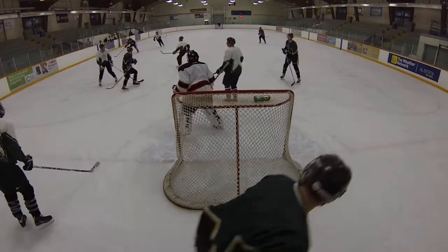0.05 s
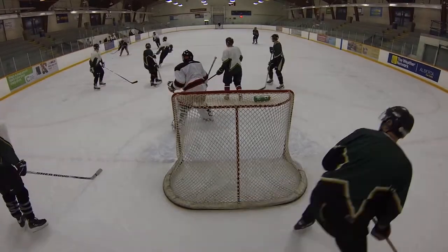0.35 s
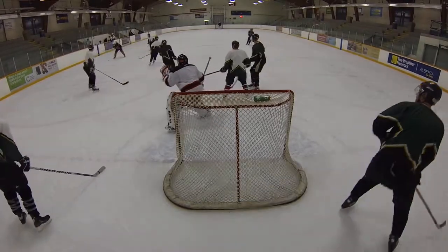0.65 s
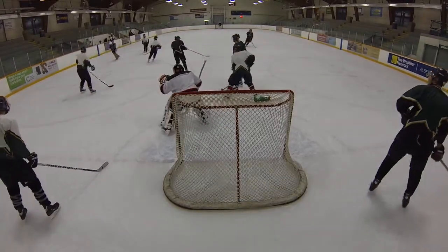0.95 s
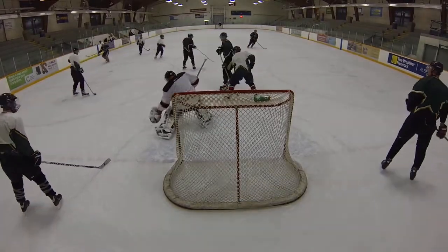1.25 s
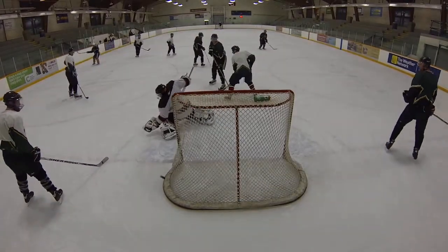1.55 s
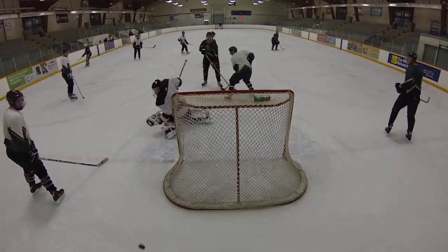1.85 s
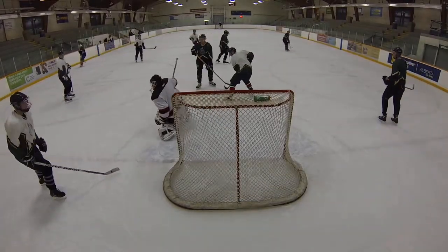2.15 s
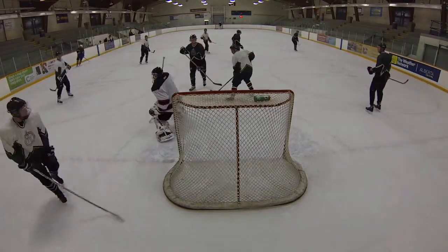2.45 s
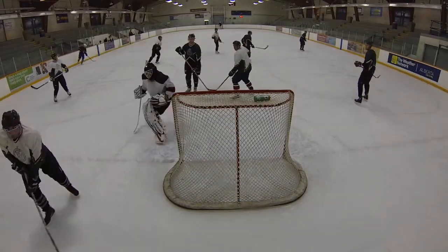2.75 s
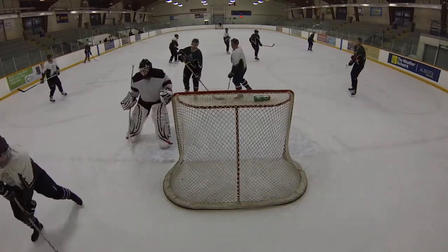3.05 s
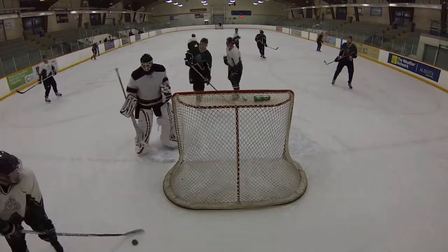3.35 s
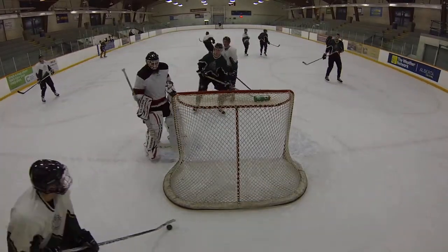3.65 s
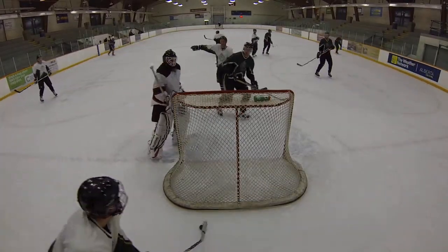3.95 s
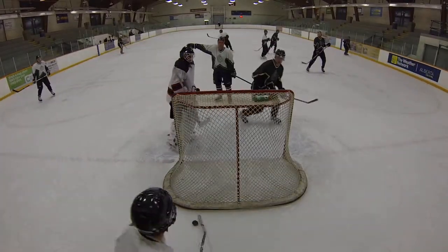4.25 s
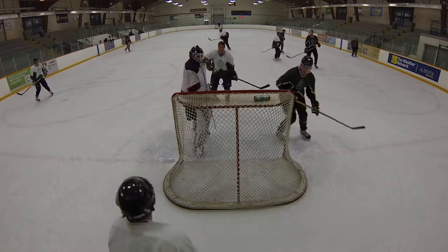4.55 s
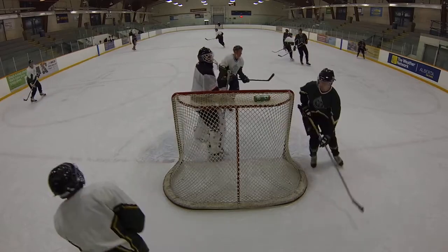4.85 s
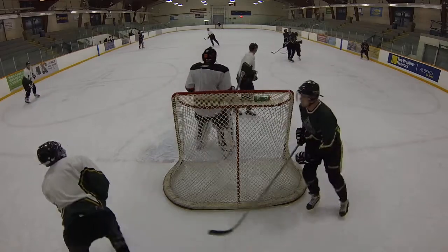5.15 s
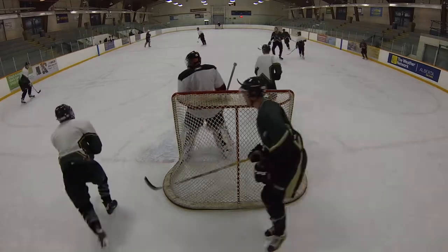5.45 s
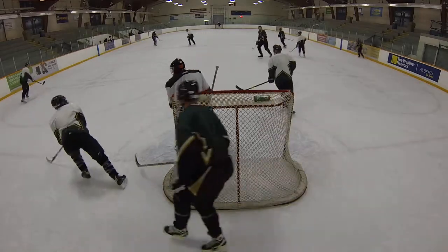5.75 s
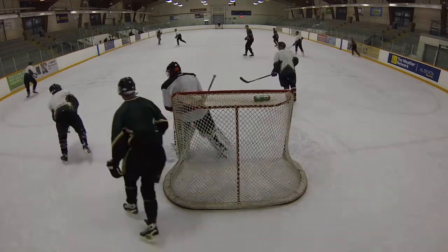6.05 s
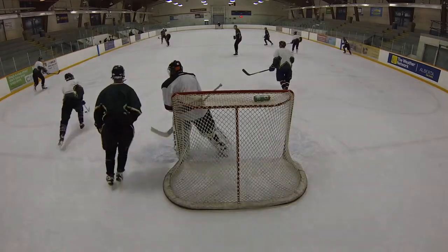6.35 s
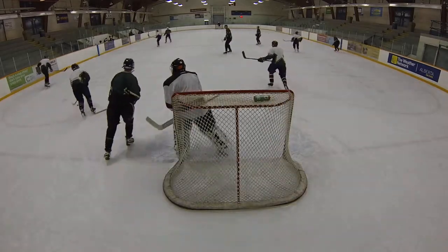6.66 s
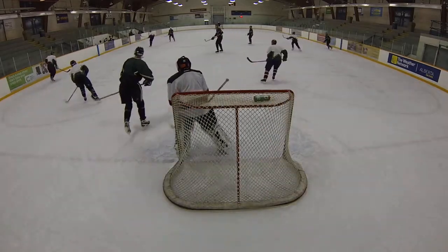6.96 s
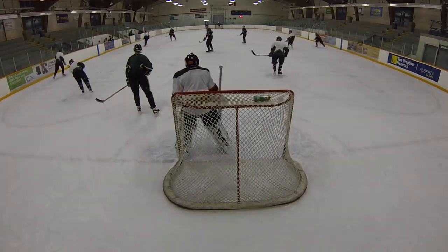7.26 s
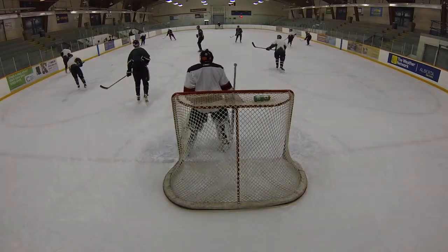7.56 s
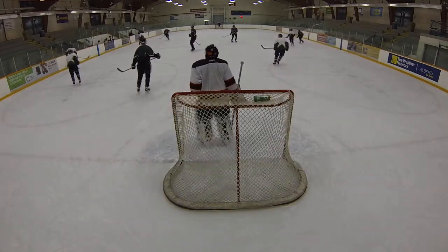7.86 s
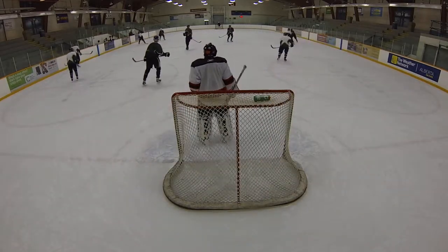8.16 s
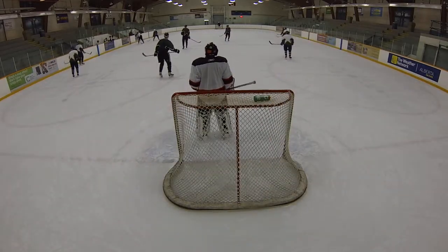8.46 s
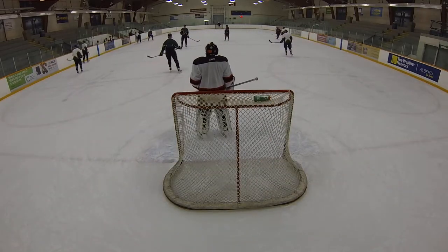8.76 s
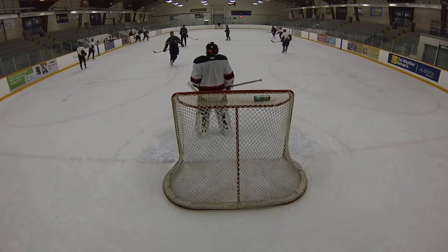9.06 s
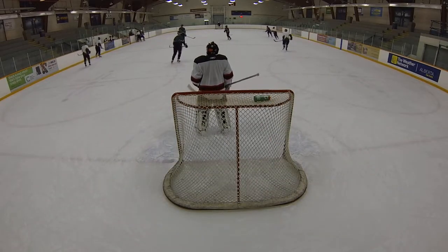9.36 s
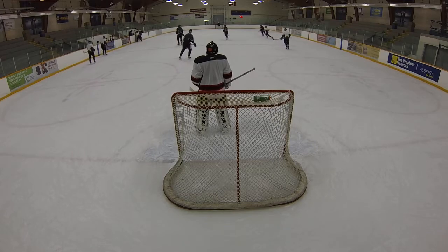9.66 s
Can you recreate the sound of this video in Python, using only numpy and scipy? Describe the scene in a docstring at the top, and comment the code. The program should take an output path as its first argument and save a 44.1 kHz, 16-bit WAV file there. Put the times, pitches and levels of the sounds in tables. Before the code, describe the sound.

Ice hockey in an indoor arena, heard from the glass behind the goal with a slightly hollow tone. Skates scrape and carve as a sharp shot echoes through the hall, then the puck thumps heavily into the boards. A skater stops hard with a spray of snow, among stick taps and dull bumps. The skating thins and a second shot cracks near the end, over humming boards and steady ventilation.

```python
"""Ice hockey in an indoor arena

Blades chip the ice as they carve and stop; sticks and puck clack, and two shots ring through the hall.
Boards and glass hum with the skating and thump under the puck, over the rush of the ventilation.
Heard from a cased camera on the glass behind the goal, whose case adds a hollow resonance."""
import sys
import numpy as np
from scipy import signal
from scipy.fft import rfft, irfft, next_fast_len
from scipy.io import wavfile
from scipy.ndimage import uniform_filter1d

SR = 44100
rng = np.random.default_rng(int(sys.argv[2]) if len(sys.argv) > 2 else 0)


def wav_record(signal):
    """Record a signal, one row per channel, as 16-bit PCM in the file named by sys.argv[1]."""
    frames = np.transpose(np.atleast_2d(signal))
    bounded = np.clip(frames, -1, 1)
    # unit amplitude maps onto the largest positive 16-bit level
    quanta = np.round(bounded * 32767).astype(np.int16)
    wavfile.write(sys.argv[1], SR, quanta)


N = 432621
HZ = np.fft.rfftfreq(N, 1 / SR)
TIME = np.arange(N) / SR
BAND_LIMIT_HZ = 15000

# normal modes of the boards and glass: f/Hz, relative level/dB, T60/s
BOARD_MODES = [(95.5, -16, 0.4), (136, -12, 0.13), (217, -2, 0.027), (288.5, -1, 0.15), (402, -12, 0.059),
               (542, -9.5, 0.06), (778, -8.5, 0.08), (866, -22, 0.21), (1000, -11, 0.023),
               (1177, -15.5, 0.041), (1420, -18, 0.025)]
# spectrum of ice spray: f/Hz, relative level/dB
SPRAY_SPECTRUM = [(1000, -39.5), (2400, -11.5), (3500, -7), (5000, -0.5), (8000, 3.5), (14000, 0)]


def amp(db):
    """Amplitude ratio of a level in decibels."""
    return 10 ** (np.asarray(db) / 20)


def unit(x):
    """Normalisation to rms 1."""
    return x / np.sqrt(np.mean(x ** 2) + 1e-20)


def at_peak(x, peak_db):
    """Normalisation to a peak level."""
    return amp(peak_db) * x / abs(x).max()


def curve(points, hz=HZ):
    """Linear interpolation on a logarithmic frequency axis."""
    f, value = np.transpose(points)
    return np.interp(np.log(hz + 1), np.log(f + 1), value)


def envelope(points):
    """Amplitude envelope from levels interpolated in time."""
    return amp(np.interp(TIME, *np.transpose(points)))


def add(mix, start_s, sound):
    """Superposition of a sound on the mix."""
    part = mix[max(round(start_s * SR), 0):][:len(sound)]
    part += sound[:len(part)]


def coloured(x, db):
    """Spectral shaping by levels given on HZ, to rms 1."""
    size = next_fast_len(N, True)
    gain = amp(np.interp(np.fft.rfftfreq(size, 1 / SR), HZ, db))
    return unit(irfft(rfft(x, size) * gain, size)[:N])


def minimum_phase(db):
    """Causal impulse response of a spectrum, by the Hilbert transform of its log magnitude."""
    log_gain = np.log(amp(np.r_[db, db[-2:0:-1]]))
    return np.fft.ifft(np.exp(np.conj(signal.hilbert(log_gain)))).real


def wander(per_s):
    """Slow random modulation of rms about 1."""
    knots = rng.standard_normal(N // 50)
    return np.interp(TIME * per_s, np.arange(len(knots)), knots) * np.sqrt(3 / 2)


def drone(db, hold_s):
    """A resonance under random excitation, its slow swells evened out."""
    x = coloured(rng.standard_normal(N), db)
    power = uniform_filter1d(x ** 2, max(int(hold_s * SR), 2))
    return x / np.sqrt(abs(power) + 1e-4)


def resonate(x, hz, width_hz):
    """A resonator of unit gain whose centre frequency follows the curve hz."""
    phasor = np.exp(2j * np.pi * np.cumsum(hz) / SR)
    pole = np.exp(-np.pi * width_hz / SR)
    return 2 * (phasor * signal.lfilter([1 - pole], [1, -pole], x / phasor)).real


def case_db(hz):
    """Transmission through the camera case: its wall absorbs treble and its resonances add peaks."""
    # resonances and notches: f/Hz, width/Hz, gain/dB
    resonances = [(552, 126, 5), (768, 96, 11), (868, 63, 6), (1060, 160, -1), (1326, 400, 13),
                  (1607, 390, 16.5), (2203, 258, 9), (2700, 370, 0.5), (3030, 255, 10.5), (3427, 365, 11.5),
                  (3853, 390, 7), (4960, 790, 4.5), (7550, 1400, 4)]
    # transmission of the wall: f/Hz, gain/dB
    wall = [(60, -13.5), (200, -1.5), (400, 2.5), (1000, 1.5), (1950, -3.5), (2700, -5), (4200, -14),
            (6000, -20.5), (9000, -33), (12000, -38.5), (14500, -47.5)]
    peaks = sum(db * 2 ** -((2 * (hz - f) / width) ** 2) for f, width, db in resonances)
    return curve(wall, hz) + peaks


def ventilation(case):
    """Moving air radiates steady broadband noise."""
    # spectrum of the air: f/Hz, relative level/dB
    spectrum = [(30, 1.5), (90, 19.5), (200, 4.5), (400, 2.5), (800, -5), (1500, -5), (3000, -4),
                (5000, -9.5), (8000, 2.5), (14000, 7.5)]
    return amp(-45.5) * coloured(rng.standard_normal(N), case + curve(spectrum))


def far_tones():
    """Narrow-band noise is heard as pitch: two faint tones swell far down the rink."""
    # tones: start t/s, peak t/s, end t/s, f/Hz, width/Hz, level/dB
    tones = [(9.2, 9.42, 10.4, 448, 20, -47), (9.15, 9.42, 9.62, 2250, 30, -46)]
    out = np.zeros(N)
    for start, peak, end, hz, width, db in tones:
        tone = drone(-20 * np.log10(1 + (2 * (HZ - hz) / width) ** 2), hold_s=0.058)
        out += amp(db) * np.interp(TIME, [start, peak, end], [0, 1, 0]) * tone
    return out


def hall(x, early_db, early_t60, late_db, late_s):
    """Reverberation: early scatter from glass and ice, then a long tail from roof and far walls."""
    # reverberation time: f/Hz, T60/s
    decay = [(200, 2.4), (800, 3.3), (1500, 3.1), (3000, 2.4), (5000, 1.3), (8000, 0.56), (14000, 1)]
    # colour of the reflections: f/Hz, relative level/dB
    walls = [(500, 0.86), (1000, 0.081), (1450, -0.78), (2400, -1.2), (3800, -1.7), (7000, 1.3),
             (13000, -1.2)]
    reflections = rng.standard_normal(2 * SR) * (rng.random(2 * SR) < 5000 / SR)
    hz, t, bands = signal.stft(reflections, SR, nperseg=256)
    far_echo = amp(late_db) * np.exp(-((t - late_s) / 0.09) ** 2)
    late = amp(-60 * t / curve(decay, hz)[:, None]) * (1 + far_echo)
    early = amp(early_db - 60 * t / early_t60)
    onset = np.clip(t / 0.0045, 0, 1)
    colour = amp(curve(walls, hz))[:, None]
    tail = signal.istft(bands * colour * (late + early) * onset, SR, nperseg=256)[1]
    return signal.fftconvolve(x, tail / np.linalg.norm(tail))[:N]


def strokes(rows, layer, rise_s, fall_s, ends_db):
    """Incoherent blade strokes add in power; each follows a parabola in level, ends_db at its ends."""
    column = {"scrape": 2, "spray": 3, "hum": 4}[layer]
    power = np.zeros(N)
    for row in rows:
        start, length = row[:2]
        t = np.arange(0, length, 1 / SR)
        contact = np.clip(np.minimum(t / rise_s, (length - t) / fall_s), 0, 1)
        load = amp(row[column] + ends_db * (2 * t / length - 1) ** 2)
        add(power, start, (contact * load) ** 2)
    return np.sqrt(power)


def striding(layer, ends_db, far_db):
    """Envelope of a skating layer: the power sum of near strides and steady far players."""
    # strides and carves: start t/s, length/s, then mid-stroke level/dB of scrape, spray and hum
    strides = [(0.0, 0.25, -39.5, -59, -50), (0.14, 0.53, -31, -50, -39), (0.56, 0.45, -33.5, -52.5, -40.5),
               (0.88, 0.73, -34.5, -53, -48.5), (1.96, 0.38, -38.5, -53, -48.5),
               (2.5, 0.36, -42, -58.5, -44.5), (2.85, 0.72, -42, -60.5, -53), (3.28, 0.28, -40, -65, -38.5),
               (4.36, 0.48, -41.5, -60, -43), (4.78, 0.51, -34.5, -51.5, -40),
               (5.24, 0.76, -44, -59.5, -40.5), (5.98, 0.46, -41, -60.5, -47),
               (6.46, 0.595, -43.5, -60, -47.5), (7.1, 0.56, -39.5, -66, -52),
               (7.54, 0.6, -43, -63.5, -52.5), (9.02, 0.46, -37.5, -60.5, -62),
               (9.36, 0.45, -37, -58, -54.5)]
    near = strokes(strides, layer, rise_s=0.027, fall_s=0.075, ends_db=ends_db)
    return np.hypot(near, amp(far_db))


def skidding(layer, ends_db):
    """Envelope of a layer of the hard stop: friction sets in quickly as the edges bite."""
    # skids: start t/s, length/s, then mid-stroke level/dB of scrape, spray and hum
    skids = [(3.72, 0.12, -30, -70, -44.5), (3.82, 0.19, -28, -56.5, -37), (3.975, 0.41, -20.5, -49, -33.5)]
    return strokes(skids, layer, rise_s=0.011, fall_s=0.055, ends_db=ends_db)


def board_drive():
    """Envelope of the boards' upper mode: forced by the blades, decaying freely after each jolt."""
    # blows on the boards: t/s, level/dB
    jolts = [(0.799, -33), (1.33, -28.5), (3.36, -34.5), (4.65, -33.5), (5.41, -34), (5.78, -35.5),
             (7.84, -37)]
    rise_s, t60 = 0.022, 0.53
    power = striding("hum", ends_db=-4, far_db=-53) ** 2 + skidding("hum", ends_db=1.5) ** 2
    t = np.arange(SR) / SR
    for start, db in jolts:
        add(power, start, (np.minimum(t / rise_s, 1) * amp(db - 60 * t / t60)) ** 2)
    return np.sqrt(power)


def glass_sway():
    """The pane vibrates in a very low resonance, strongly at first and then settling."""
    # sway: t/s, level/dB
    sway = [(0.0, -14), (0.66, -28), (0.8, -34.5), (3.3, -39), (4.15, -36.5), (6.5, -38), (9.81, -45)]
    # resonance of the pane: f/Hz, relative level/dB
    pane = [(10, -53.5), (19, -13.5), (26.5, 1.0), (33, -12), (41, -30.5), (80, -68.0), (200, -110)]
    return envelope(sway) * drone(curve(pane), hold_s=0.2)


def board_hum():
    """Forced vibration: skating drives two modes of the boards and a broad rumble."""
    # low hum, highest while skaters pass close behind the goal: t/s, level/dB
    passes = [(0.0, -31.5), (0.6, -31), (1.4, -32), (1.85, -39.5), (2.45, -31), (3.1, -36.5), (3.65, -35.5),
              (4.05, -26.5), (4.55, -31), (5.15, -26), (6.0, -32), (7.3, -35.5), (8.3, -42), (9.81, -40.5)]
    # spectra of the lowest mode, the rumble and the upper mode: f/Hz, relative level/dB
    low_spectrum = [(50, -34), (66, -17), (80, -16), (92, 1.5), (103, -12.5), (120, -14.5), (145, -33),
                    (200, -48)]
    rumble_spectrum = [(30, -19.5), (46, -10), (64, -1.5), (90, -2), (118, -3), (145, -0.5), (180, -19.5),
                       (260, -27)]
    upper_spectrum = [(150, -22), (210, -17.5), (255, -17), (292, -1), (320, -9), (350, -25), (450, -35.5),
                      (800, -49)]
    rolloff = -40 * np.log10(1 + (HZ / 900) ** 2)  # the heavy panels carry no treble
    shake = envelope(passes) * amp(1.5 * wander(per_s=12))  # the skaters' weight shifts unevenly
    drive = board_drive()
    low = shake * drone(curve(low_spectrum) + rolloff, hold_s=0.15)
    rumble = np.hypot(amp(-10) * shake, drive) * drone(curve(rumble_spectrum) + rolloff, hold_s=0.17)
    upper = drive * drone(curve(upper_spectrum) + rolloff, hold_s=0.18)
    return low + rumble + upper


def board_bumps(rise_s, t60):
    """A soft blow excites only the lowest mode of the boards."""
    # footfalls and dull bumps: t/s, peak level/dB
    bumps = [(0.718, -27), (0.874, -17.5), (1.335, -18), (1.4, -20.5), (1.97, -27), (2.183, -25.5),
             (2.287, -12.5), (2.55, -19), (2.782, -27), (3.291, -22.5), (3.49, -22), (3.78, -17),
             (3.873, -14), (3.98, -15.5), (4.225, -16.5), (4.31, -15.5), (4.658, -18), (4.75, -25.5),
             (4.998, -9), (5.063, -15), (5.286, -9), (5.595, -23.5), (5.68, -20), (5.786, -20.5),
             (6.222, -22), (6.37, -22), (7.105, -27), (7.32, -27), (7.72, -26.5)]
    t = np.arange(SR // 2) / SR
    onset = 1 - np.exp(-(t / rise_s) ** 2)
    ring = np.sin(2 * np.pi * BOARD_MODES[0][0] * t) * onset * amp(-60 * t / t60)
    out = np.zeros(N)
    for start, db in bumps:
        add(out, start, at_peak(ring, db))
    return out


def puck_thump(cutoff_hz, rise_s):
    """The puck sets the boards' damped modes ringing; its compliant rubber weakens the highest."""
    # impact: t/s, peak level/dB
    start, peak_db = 2.2335, -5
    t = np.arange(SR // 2) / SR
    ring = np.zeros(len(t))
    for k, (hz, db, t60) in enumerate(BOARD_MODES):
        excitation = (-1) ** k / (1 + (hz / cutoff_hz) ** 4)
        ring += excitation * amp(db - 60 * t / t60) * np.sin(2 * np.pi * hz * t)
    out = np.zeros(N)
    add(out, start, at_peak(ring * (1 - np.exp(-t / rise_s)), peak_db))
    return out


def chips(per_s, spread_db, hiss, chatter_db, chatter_per_s):
    """Brittle fracture under an edge: random impulses and hiss, modulated by the blade's chatter."""
    size = amp(spread_db * np.minimum(rng.exponential(1, N), 4)) * rng.standard_normal(N)
    cracks = unit(size * (rng.random(N) < per_s / SR))
    return (cracks + hiss * rng.standard_normal(N)) * amp(chatter_db * wander(chatter_per_s))


def shifting(x, depth_db):
    """The contact length of the edge keeps changing, so narrow bands of the scrape come and go."""
    bands = signal.stft(x, SR, nperseg=512)[2]
    patches = uniform_filter1d(rng.standard_normal(bands.shape), size=4, axis=0)
    patches = uniform_filter1d(patches, size=20, axis=1)
    return signal.istft(bands * amp(depth_db * unit(patches)), SR, nperseg=512)[1][:N]


def skating(case):
    """Sliding friction: blades scrape the rink and throw a hissing spray."""
    # spectrum of the scrape: f/Hz, relative level/dB
    spectrum = [(150, -23.5), (400, 0.5), (800, -5), (1500, 0.5), (2400, 3), (3500, -7.5), (5000, -2.5),
                (9000, -25)]
    edge = chips(per_s=1100, spread_db=2.5, hiss=1.7, chatter_db=1.3, chatter_per_s=45)
    snow = chips(per_s=1500, spread_db=-0.5, hiss=1.0, chatter_db=3.0, chatter_per_s=50)
    scrape = coloured(edge, case + curve(spectrum))
    spray = coloured(shifting(snow, depth_db=1.5), case + curve(SPRAY_SPECTRUM))
    scrape *= striding("scrape", ends_db=-3.5, far_db=-48.5)
    spray *= striding("spray", ends_db=-6, far_db=-66)
    return scrape + spray


def scuffs(case):
    """Chips excite the modes of a briefly biting blade, whose pitch arches with the load."""
    # scuffs and cuts: t/s, rms level/dB, length/s, lowest mode f/Hz
    cuts = [(0.243, -57, 0.06, 3020), (2.04, -61, 0.24, 4900), (2.095, -53, 0.08, 2900),
            (2.123, -44, 0.13, 2250), (3.192, -59, 0.14, 4900), (3.71, -53.5, .1, 2400),
            (3.905, -49, 0.09, 2350), (3.994, -61, 0.085, 6500), (5.736, -62, 0.043, 5000),
            (5.871, -59, 0.027, 5060), (6.055, -66, .1, 5460), (6.26, -75, 0.054, 5500),
            (6.463, -64, 0.091, 5200), (7.597, -59, 0.17, 4530), (7.788, -61, 0.036, 5000),
            (9.037, -52.5, 0.15, 2940), (9.387, -58, 0.12, 4800)]
    # modes of a steel blade: frequency ratio, relative level/dB
    modes = [(1, 3), (1.3, -2), (1.56, -3), (2.149, -6), (3.35, -1)]
    grit = chips(per_s=1200, spread_db=-1.5, hiss=1.0, chatter_db=6.0, chatter_per_s=100)
    grit = coloured(grit, case + curve([(1500, -10.5), (2300, 8.0), (5000, -5.0), (9000, 6.5)]))
    out = np.zeros(N)
    for start, db, length, hz in cuts:
        force = grit[int(start * SR):][:int(length * SR)]
        progress = np.linspace(0, 1, len(force))
        pitch = hz * (1 + 0.048 * (np.sin(np.pi * progress) - 0.5))
        width_hz = 0.15 * hz
        ring = np.zeros(len(force))
        for ratio, mode_db in modes:
            if hz * ratio < BAND_LIMIT_HZ:
                band = resonate(force, pitch * ratio, width_hz)
                ring += amp(mode_db) * resonate(band, pitch * ratio, width_hz)
        contact = np.interp(progress, [0, 0.15, 0.7, 1], [0.41, 1, 0.37, 0.079])
        add(out, start, amp(db) * unit(ring * contact))
    return out


def hard_stop(case):
    """Abrasion: both blades, turned sideways, shave the ice and fling a sheet of snow."""
    # spectrum of the skid: f/Hz, relative level/dB
    spectrum = [(150, -5), (400, -7), (800, -14.5), (1350, 9.5), (1750, -1), (2400, 1), (3500, -13.5),
                (5000, -25), (9000, -17.5)]
    finer = curve([(3000, -3.5), (5000, 1.5), (8500, 2), (14000, 4.5)])  # finer than a glide's spray
    edge = chips(per_s=1600, spread_db=-1.5, hiss=1.0, chatter_db=0.0, chatter_per_s=170)
    scrape = coloured(shifting(edge, depth_db=1.5), case + curve(spectrum))
    spray = coloured(shifting(edge, depth_db=1), case + curve(SPRAY_SPECTRUM) + finer)
    return skidding("scrape", ends_db=-4.5) * scrape + skidding("spray", ends_db=-10.5) * spray


def shaft(peak_db, hz, t60):
    """Free vibration: a struck stick shaft rings briefly in a cluster of modes."""
    # modes of a shaft: frequency ratio, relative level/dB
    modes = [(1, 1.5), (1.148, 0.5), (1.45, -13), (1.622, -14)]
    t = np.arange(4096) / SR
    ring = sum(amp(db) * np.sin(2 * np.pi * (hz * ratio * t + rng.random())) for ratio, db in modes)
    onset = 1 - np.exp(-t / 0.0003)
    return at_peak(ring * amp(-60 * t / t60) * onset, peak_db)


def clack(peak_db, treble_db, low_db, t60, rattle):
    """A hard contact: an impulse and its brief rattle, convolved with the response of the case."""
    # spectrum of the contact: f/Hz, relative level/dB
    contact = [(480, -3), (790, -1), (1100, -0.5), (1550, -2.5), (2300, 2.5), (3400, -1.5),
               (5000, 3.5), (12000, 0)]
    hz = np.fft.rfftfreq(2048, 1 / SR)
    t = np.arange(4096) / SR
    body = case_db(hz) + curve(contact, hz)
    power = amp(body) ** 2
    body_low, body_treble = (10 * np.log10(power[(hz > bottom) & (hz < top)].sum() / power.sum())
                             for bottom, top in [(400, 1000), (3000, 9000)])
    # a harder contact is brighter, a heavier one has more low end
    tilt = [(900, low_db - body_low), (1350, 0.015), (1900, 0), (3400, treble_db - body_treble)]
    force = rattle * rng.standard_normal(len(t)) * amp(-60 * t / max(t60, 0.003))
    force[0] += 1
    return at_peak(signal.fftconvolve(force, minimum_phase(body + curve(tilt, hz))), peak_db)


def sticks():
    """Impacts of stick, ice and puck: the direct sound, and the part that excites the hall."""
    # contacts in the two shots: t/s, peak level/dB, nominal treble and low shares/dB, rattle T60/s
    shots = [(0.832, -4, -13.5, -41, 0.016), (0.853, -9.5, -15, -24.5, 0.031),
             (0.86, -5.5, -17, -23.5, 0.034), (0.874, -7.5, -10, -19.5, 0.029),
             (0.877, -6, -10, -22.5, 0.018), (0.887, -12.5, -22, -14, 0.031), (0.902, -11, -26, -28, 0.059),
             (8.356, -10, -18, -27, 0.014), (8.362, -5.5, -10.5, -20.5, 0.013),
             (8.376, -9.5, -19, -26, 0.011), (8.407, -20.5, -22, -22, 0.021)]
    # stick taps and blade strikes, close by but for a far clack at 9.39 s: t/s, peak level/dB, nominal treble
    # and low shares/dB
    taps = [(0.111, -21.5, -10, -14), (0.129, -16, -16, -17.5), (0.281, -23.5, -33, -23),
            (1.327, -10.5, -9.5, 0.5), (1.969, -24, -28, -9), (2.232, -17.5, -35, -3.5),
            (3.029, -26, -31, -6.5), (3.3, -11, -28.5, -20), (3.386, -25, -39, -19),
            (3.445, -16, -27.5, -15.5), (3.48, -23.5, -27, -14), (3.833, -10.5, -22, -5.5),
            (3.987, -13, -39, -36), (4.66, -18, -39, -13), (4.715, -24.5, -33, -27), (4.749, -25, -27, -22),
            (4.76, -17.5, -43.5, -18.5), (4.812, -20.5, -33.5, -33.5), (4.845, -25, -19, -6.5),
            (5.208, -19.5, -41, -10), (5.293, -21.5, -28, -5), (5.596, -23, -27, -19),
            (5.821, -22, -22, -10), (5.947, -23.5, -26, -9), (6.113, -29, -10, -22),
            (6.212, -20.5, -15.5, -15), (6.278, -26, -22, -25), (6.592, -27, -19, -24),
            (6.734, -21, -17.5, -16), (6.779, -26.5, -37, -29), (7.111, -28, -15, -38),
            (7.17, -16.5, -10, -3.5), (7.201, -22, -16, -40), (8.565, -16, -25, -19),
            (9.044, -23.5, -20, -19), (9.392, -23, -13, -12)]
    # shafts ringing after the hardest blows: t/s, peak level/dB, lowest mode f/Hz, T60/s
    shafts = [(0.833, -5, 2060, 0.016), (0.877, -10, 1480, 0.033), (3.2989, -12, 3390, 0.019),
              (3.3, -10.5, 1410, 0.027), (3.833, -8.5, 1266, 0.025), (7.17, -24, 1840, 0.034),
              (8.355, -19, 1600, 0.0077), (8.364, -17, 3040, 0.031), (8.377, -16, 1145, 0.025),
              (9.39, -31.5, 4800, 0.023)]
    direct, to_hall = np.zeros((2, N))
    for start, db, treble_db, low_db, t60 in shots:
        add(direct, start, clack(db, treble_db, low_db, t60, rattle=0.14))
        add(to_hall, start, clack(db - 2, treble_db=-18.5, low_db=low_db, t60=t60, rattle=0.17))
    for start, db, treble_db, low_db in taps:
        t60 = 0.03 * 2 ** (low_db / 41 - db / 36)  # a hollow or light tap rattles longer
        tap = clack(db, treble_db, low_db, t60, rattle=0.15)
        add(direct, start, tap)
        add(to_hall, start, amp(-6.5) * tap)
    for start, db, hz, t60 in shafts:
        ring = shaft(db, hz, t60)
        add(direct, start, ring)
        add(to_hall, start, amp(-25) * ring)
    return direct, to_hall


def scene():
    """Superposition of the arena's background, the boards, the blades and the sticks."""
    case = case_db(HZ)
    direct, to_hall = sticks()
    air = ventilation(case)
    echo = amp(-0.5) * hall(to_hall, early_db=3.0, early_t60=0.16, late_db=-9.5, late_s=0.38)
    blades = skating(case) + scuffs(case) + hard_stop(case)
    hum = glass_sway() + board_hum()
    blows = board_bumps(rise_s=0.0061, t60=0.36) + puck_thump(cutoff_hz=1900, rise_s=0.0055)
    return (air + far_tones() + echo + hum + blows + blades + direct)[None]


def record(dry):
    """Band limiting by a linear-phase low-pass filter."""
    lowpass = signal.firwin(511, BAND_LIMIT_HZ, window=("kaiser", 9), fs=SR)
    return signal.oaconvolve(dry, lowpass[None], "same")


dry = scene()
out = record(dry)
wav_record(out)
```